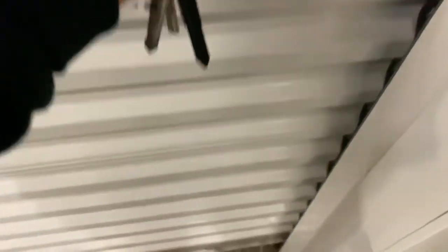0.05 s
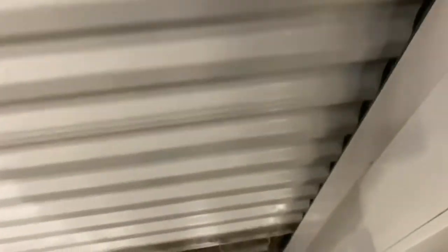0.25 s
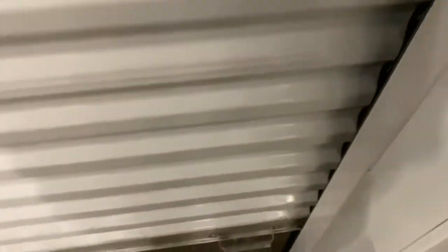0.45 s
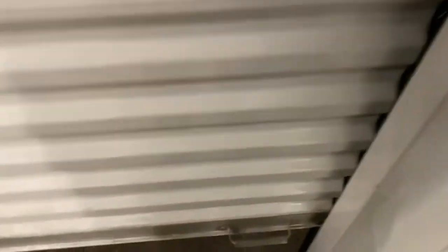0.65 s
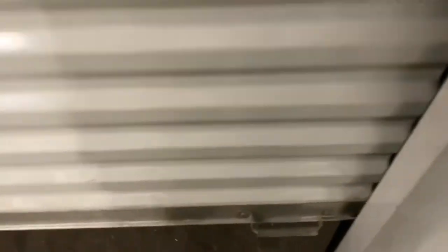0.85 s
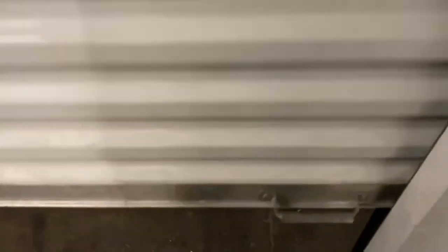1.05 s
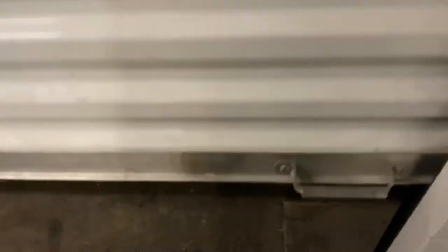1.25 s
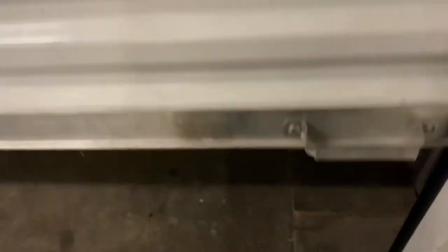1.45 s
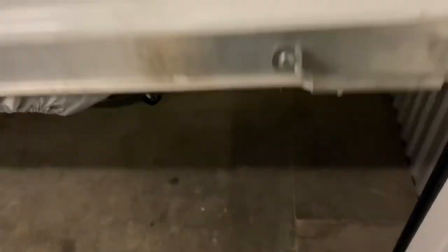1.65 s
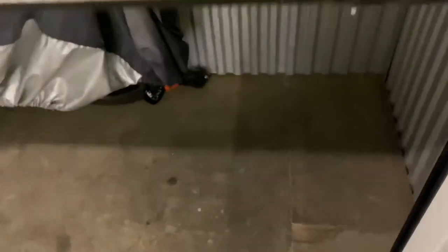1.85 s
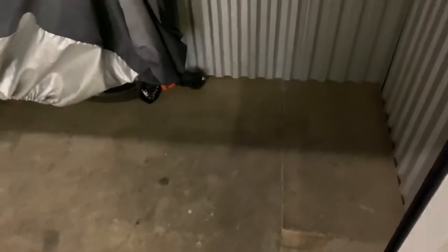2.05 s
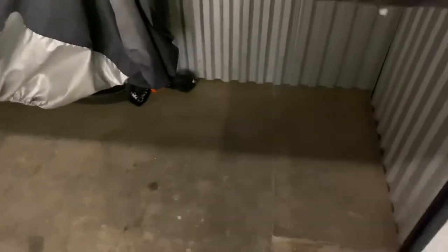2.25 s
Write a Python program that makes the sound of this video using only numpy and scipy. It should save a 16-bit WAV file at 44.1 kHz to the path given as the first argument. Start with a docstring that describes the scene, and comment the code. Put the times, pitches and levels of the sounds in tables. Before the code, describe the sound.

A metal roll-up door rolls open in an echoing storage corridor, near the microphone and slightly left. Its booming, knocking and rattling build to a loud clang at the top, followed by a small clink of keys.

```python
"""Opening a steel roll-up door

A corrugated door is pushed open in a storage corridor, close by and a little to the left. Its curtain
(the big ribbed sheet) booms, rattles and scrapes in the side guides, knocks, squeals and clangs against
the top stop. Keys clink in a hand while the door settles and the corridor's echo dies away."""
import sys
import numpy as np
from scipy import signal
from scipy.fft import rfft, irfft, next_fast_len
from scipy.io import wavfile
from scipy.ndimage import uniform_filter1d, map_coordinates

SR = 44100
rng = np.random.default_rng(int(sys.argv[2]) if len(sys.argv) > 2 else 0)


def digitize_waveform(pressure):
    """Quantize a signal to 16-bit integers and store it at the path in sys.argv[1].

    Rows of a 2-D input are taken as channels; values are limited to [-1, 1].
    """
    field = np.atleast_2d(pressure).T
    bounded = np.clip(field, -1, 1)
    quanta = np.round(bounded * 32767).astype(np.int16)
    wavfile.write(sys.argv[1], SR, quanta)


N = 101429

# A mode is a tone that an object rings at; t60 is the time a sound takes to fade by 60 dB.
# modes of the steel curtain: f/Hz, level/dB, t60/s
CURTAIN_MODES = [(63.1, -3.5, 0.3), (165.7, -1, .3), (380.5, -5, 0.2), (465, -9, 0.2), (502, -3, 0.12),
                 (705, -2, 0.11), (868, -4, 0.11), (1090, -6, .1)]
# modes of the door's bottom bar and its stops: f/Hz, level/dB, t60/s
BAR_MODES = [(1610, -1, .25), (1676, 1, .27), (1734, -1, .27), (2080, -4, .35), (2265, -3, .3),
             (2352, 0, .33), (2482, -3, .3), (4060, -4, .35), (5006, -3, .35), (6250, -2, .35),
             (6948, 0, .4), (7270, 5, .35), (9318, 0, .3), (10130, 1, .25)]


def undb(db):
    """Turn decibels into a factor to multiply by."""
    return 10 ** (np.asarray(db) / 20)


def unit(x):
    """Scale a signal to an average strength (rms) of 1."""
    return x / np.sqrt(np.mean(x ** 2))


def colour(x, points):
    """Make some pitches louder and others softer, along a curve of (f/Hz, level/dB) points."""
    hz, db = np.array(points, float).T
    size = next_fast_len(2 * N)
    f = np.maximum(np.fft.rfftfreq(size, 1 / SR), 1)
    gain = undb(np.interp(np.log(f), np.log(hz), db))
    # folding the cepstrum keeps the filter from sounding before its input
    cepstrum = irfft(np.log(gain), size)
    cepstrum[1:size // 2] *= 2
    cepstrum[size // 2 + 1:] = 0
    return irfft(rfft(x, size) * np.exp(rfft(cepstrum)), size)[:N]


def band(x, lo_hz, hi_hz):
    """Keep the pitches between two limits."""
    edges = [lo_hz, min(hi_hz, SR / 2 - 1)]
    return signal.sosfilt(signal.butter(3, edges, "band", fs=SR, output="sos"), x)


def fade(t, t60):
    """Silent before t = 0, then a jump to 1 that dies away."""
    return (t >= 0) * np.exp(-np.log(1000) * np.maximum(t, 0) / t60)


def drift(per_s):
    """A smooth random curve, about 1 in size, that heads for a new value per_s times a second."""
    step = int(SR / per_s)
    stairs = np.repeat(rng.standard_normal(N // step + 1), step)
    return unit(uniform_filter1d(stairs, step)[:N])


def grains(per_s, spread_db):
    """Tiny random impacts; a larger spread makes a few much stronger than the rest."""
    chance, size, sign = rng.random(N), rng.exponential(size=N), rng.choice([-1, 1], N)
    return (chance < per_s / SR) * sign * undb(spread_db * np.minimum(size, 4))


def still_air():
    """The building's air is a soft, low noise, different in each ear."""
    # tone of the air: f/Hz, level/dB
    air_tone = [(25, -6), (70, -3), (200, -0.5), (700, -15), (2000, -26), (5000, -34), (12000, -51)]
    return np.array([unit(colour(rng.standard_normal(N), air_tone)) for _ in range(2)])


def corridor(x, echo_db):
    """Steel walls and concrete echo: alike in both ears in the bass, shorter in the treble."""
    alike_hz, treble_hz, build_s = 265, 4000, .00025
    t = np.arange(N) / SR
    f = np.fft.rfftfreq(N, 1 / SR)
    mid, side = rfft(rng.standard_normal((2, N)))
    alike = 1 / (1 + (f / alike_hz) ** 2)
    noise = (mid * np.sqrt(1 + alike) + np.array([[1], [-1]]) * side * np.sqrt(1 - alike)) / np.sqrt(2)
    treble = f ** 2 / (f ** 2 + treble_hz ** 2)
    low_tail = irfft(noise * (1 - treble), N) * fade(t, t60=.63)
    high_tail = irfft(noise * treble, N) * fade(t, t60=.5)
    tail = (low_tail + high_tail) * (1 - np.exp(-t / build_s))
    tail /= np.sqrt(np.sum(tail ** 2) / 2)
    return undb(echo_db) * signal.fftconvolve(x[None], tail, axes=1)[:, :N]


def keys(t):
    """Keys tap each other: a tick and a short ring."""
    # taps of key on key: t/s, level/dB, pitch/ratio
    taps = [(1.9615, -42, 1.04), (1.9925, -21, 1), (2.003, -27, 1), (2.078, -33, .9)]
    # modes of the keys: f/Hz, level/dB, t60/s
    key_modes = [(3400, -2, .03), (5195, -15, .025), (6030, -12, .02), (6720, -8, .025), (9800, -15, .015),
                 (10750, -8, .018), (11150, -10, .015), (14800, -14, .02)]
    out = 0
    for start, db, pitch in taps:
        age = t - start
        ring = sum(undb(mode_db) * np.sin(2 * np.pi * hz * pitch * age) * fade(age, t60)
                   for hz, mode_db, t60 in key_modes)
        tick = band(rng.standard_normal(N) * fade(age, t60=.036), 1600, 7100)
        out += undb(db) * (ring + undb(2) * tick) / 2
    return out


def edge_strips(t):
    """The curtain's edge strips grab with a gritty rasp, then slide with a smooth hiss."""
    # tone of the rasp: f/Hz, level/dB
    rasp_tone = [(800, -12), (2000, -3), (4200, 0), (7000, -7), (11000, -11), (13000, -26)]
    # tone of the hiss: f/Hz, level/dB
    hiss_tone = [(1500, 17), (4000, -9), (6900, 9.5), (9000, 3), (11500, 4), (13000, -42)]
    grab_s, stop_s = .214, 1.63
    rasp = unit(colour(grains(per_s=1700, spread_db=4), rasp_tone))
    hiss = unit(colour(rng.standard_normal(N), hiss_tone))
    sliding = np.where(t < grab_s, undb(-7), fade(np.maximum(t - stop_s, 0), t60=.39))
    return undb(-42) * fade(t - grab_s, t60=.4) * rasp + undb(-46.5) * sliding * hiss


def squeals(t):
    """Dry steel drags on steel in the guide and gives brief, rough tones."""
    # squeals: start/s, length/s, f/Hz, level/dB
    drags = [(1.568, .05, 4720, -46), (1.62, .06, 4640, -33), (.809, .042, 15150, -33)]
    pitch_wobble, ramp_s, rough_db = .006, .009, 2.5
    out = 0
    for start, length, hz, db in drags:
        gate = np.clip(np.minimum(t - start, start + length - t) / ramp_s, 0, 1)
        wobbling_hz = hz * (1 + pitch_wobble * drift(per_s=1200))
        tone = np.sin(2 * np.pi * np.cumsum(wobbling_hz) / SR)
        out += undb(db) * gate * unit(tone * undb(rough_db * drift(per_s=220)))
    return out


def flexes(t):
    """The whole sheet bows and swings back: a few deep cycles that swell and fade."""
    # swings of the curtain: middle/s, length/s, f/Hz, level/dB
    swings = [(.46, .12, 64, -31), (.885, .17, 77, -22), (1.095, .12, 62, -22), (1.75, .15, 68, -24)]
    out = 0
    for middle, length, hz, db in swings:
        swell = np.cos(np.pi * np.clip((t - middle) / length, -.5, .5)) ** 2
        out += undb(db) * swell * np.sin(2 * np.pi * hz * (t - middle + rng.random() / hz))
    return out


def resonate(x, modes, ring_db):
    """A sound plus the modes that it sets ringing."""
    t = np.arange(SR) / SR
    ring = sum(undb(db) * 2 * np.cos(2 * np.pi * hz * t) * fade(t, t60) / np.sum(fade(t, t60))
               for hz, db, t60 in modes)
    return x + undb(ring_db) * signal.fftconvolve(x, ring)[:N]


def steel(x):
    """A sound makes the curtain ring, and then its bottom bar."""
    curtain = resonate(x, CURTAIN_MODES, ring_db=-2.5)
    return resonate(curtain, BAR_MODES, ring_db=0)


def top_stop(t):
    """The bar clangs on the top stops and bounces; each hit rings the modes near its own pitch."""
    # hits of the bar: t/s, level/dB, centre f/Hz, t60/s
    hits = [(1.6965, -21, 1700, .09), (1.698, -35, 9500, .09), (1.707, -36, 7300, .16),
            (1.7515, -36, 5500, .1), (1.8, -35, 2200, .1), (1.801, -23, 1050, .08), (1.815, -19, 720, .11)]
    octave_away_db = -20
    out = 0
    for start, db, centre_hz, t60 in hits:
        age = t - start
        for hz, mode_db, _ in CURTAIN_MODES + BAR_MODES:
            gain = undb(db + mode_db + octave_away_db * np.log2(hz / centre_hz) ** 2)
            out += gain * rng.choice([-1, 1]) * np.sin(2 * np.pi * hz * age) * fade(age, t60)
    return out


def knocks(t):
    """The curtain hits its guides and the stop: each knock is a crack and a short wash of steel noise."""
    # knocks, with a level for each of four pitch bands: t/s, thud/dB, clank/dB, clash/dB, sizzle/dB
    blows = [(.226, -37, -29, -35, -37), (.3, -35, -33, -28, -42), (.415, -38, -39, -35, -47),
             (.46, -28, -29, -46, -53), (.573, -31, -26, -42, -50), (.659, -31, -23, -35, -42),
             (.7, -31, -27, -41, -50), (.752, -36, -33, -37, -40), (.768, -19, -24, -30, -38),
             (.779, -20, -21, -17, -31), (.799, -20, -27, -31, -47), (.934, -30, -23, -25, -36),
             (.957, -27, -24, -42, -50), (1.041, -29, -19, -29, -48), (1.098, -21, -27, -34, -40),
             (1.241, -25, -21, -27, -29), (1.291, -29, -20, -33, -38), (1.333, -34, -26, -35, -36),
             (1.439, -14, -17, -33, -44), (1.476, -33, -24, -37, -48), (1.538, -22, -25, -39, -48),
             (1.609, -18, -25, -36, -39), (1.658, -36, -23, -22, -35), (1.69, -36, -28, -22, -38),
             (1.696, -35, -24, -12, -19), (1.708, -38, -25, -21, -23), (1.751, -32, -31, -27, -19),
             (1.8, -30, -22, -19, -31), (1.923, -35, -36, -39, -45), (2.035, -29, -38, -52, -60)]
    # edges of the bands: f/Hz
    edges = [70, 280, 950, 2800, 15500]
    # fade time of each band: t60/s
    fade_times = [.17, .14, .09, .11]
    # gain of each band: level/dB
    band_db = [-3.5, -4, -4.5, -3]
    # tone of struck sheet steel: f/Hz, level/dB
    sheet_tone = [(70, -9), (160, 5.5), (260, -3), (500, -1), (750, -1.5), (1100, -7), (1400, -12),
                  (1680, -12.5), (1950, -15.5), (2300, -17), (2800, -19), (3400, -17), (4100, -16.5),
                  (4450, -24), (5050, -16), (5500, -20.5), (7300, -26.5), (8600, -35.5), (10800, -33.5),
                  (13000, -44)]
    crack_db, crack_t60 = -3, .005 * np.log(1000)
    wash = colour(rng.standard_normal(N), sheet_tone)
    out = 0
    for k, t60 in enumerate(fade_times):
        lo_hz, hi_hz = edges[k:k + 2]
        bursts = sum(undb(levels[k]) * (fade(t - at, t60) + undb(crack_db) * fade(t - at, crack_t60))
                     for at, *levels in blows)
        noise = band(wash, lo_hz, hi_hz)
        steady_noise = noise / np.sqrt(uniform_filter1d(noise ** 2, size=700))
        out += undb(band_db[k]) * band(steady_noise * bursts, lo_hz / 2, hi_hz * 2)
    return steel(out)


def bend(x):
    """The ringing drifts up and down in pitch as the curtain bends over the drum it winds on."""
    speed = 1 + .07 * drift(per_s=14)
    return map_coordinates(x, [np.cumsum(speed)], mode="mirror")


def rolling(t):
    """The flexing curtain booms, its ribs chatter over the drum, its edges scrape along the guides."""
    # loudness of the moving door: t/s, boom/dB, rattle/dB, scrape/dB
    travel = [(0, -39, -34, -42), (.2, -35.5, -42, -52), (.33, -37, -34.5, -46.5), (.55, -31.5, -39.5, -42),
              (.72, -31.5, -31, -39.5), (.87, -26, -37, -38.5), (1, -31.5, -32.5, -37.5),
              (1.1, -41, -51, -36), (1.16, -39, -32.5, -41), (1.218, -29, -28.5, -33.5),
              (1.362, -30.5, -22, -29), (1.48, -31, -27.5, -34.5), (1.58, -31.5, -31.5, -36),
              (1.67, -24.5, -18, -19), (1.76, -27, -59, -63), (1.84, -29.5, -40, -53),
              (1.93, -32.5, -33, -31.5), (2.03, -46, -47, -49), (2.13, -44, -49, -48.5),
              (2.3, -53, -58, -88)]
    # tones of the boom, the rattle and the scrape: f/Hz, level/dB
    boom_tone = [(20, -35), (33, -16), (40, -8), (50, 2), (66, 2), (80, 4.5), (100, 3), (125, -1),
                 (162, -3), (200, -3), (260, -14.5), (420, -42.5)]
    rattle_tone = [(120, -24.5), (230, -2.5), (300, 7), (400, 1), (520, 4), (720, 1.5), (900, -5.5),
                   (1250, -5), (2200, -36.5)]
    scrape_tone = [(500, 4), (1000, 2), (1400, 13.5), (2300, 13.5), (3100, 15), (4900, 6.5), (5600, 7),
                   (7000, -1), (9000, -4.5), (11500, -7.5), (13000, -21), (15500, 1)]
    times, *levels = np.array(travel).T
    boom_gain, rattle_gain, scrape_gain = (undb(np.interp(t, times, db)) for db in levels)
    boom = bend(steel(colour(grains(per_s=900, spread_db=2.3), boom_tone)))
    rattle = bend(steel(colour(grains(per_s=400, spread_db=2), rattle_tone)))
    scrape = steel(colour(grains(per_s=7000, spread_db=0), scrape_tone))
    clatter = undb(-1) * unit(rattle) * rattle_gain + undb(-4) * unit(scrape) * scrape_gain
    judder = undb(2 * drift(per_s=54.02))  # the level shakes by about 2 dB
    return undb(1) * unit(boom) * boom_gain + judder * clatter


def scene():
    """The door reaches the left ear first; the keys are close and in the middle."""
    # how much louder the door is on the left than on the right: f/Hz, level/dB
    balance = [(60, 1), (200, -2), (380, 1), (700, 5), (1290, -0.5), (2380, -2), (4400, 2.5), (8100, -3.5),
               (15000, 1.5)]
    right_delay_s = .0004463
    t = np.arange(N) / SR
    door = rolling(t) + flexes(t) + edge_strips(t) + knocks(t) + top_stop(t) + squeals(t)
    clinks = keys(t)
    delay = np.exp(-2j * np.pi * np.fft.rfftfreq(2 * N, 1 / SR) * right_delay_s)
    late_door = irfft(rfft(door, 2 * N) * delay)[:N]
    left, right = np.array([door, late_door]) + corridor(door, echo_db=-.5)
    left = colour(left, [(hz, db / 2) for hz, db in balance])
    right = colour(right, [(hz, -db / 2) for hz, db in balance])
    air = undb(-45) * still_air()
    return undb(-3.5) * np.array([left, right]) + clinks + corridor(clinks, echo_db=-17) + air


def record(dry):
    """The highest treble is dulled, and a steep filter cuts off the very top."""
    # treble roll-off: f/Hz, level/dB
    treble_rolloff = [(1000, 0), (12000, 0), (12900, -7), (16000, -7)]
    top_hz = 15900
    dulled = np.array([colour(x, treble_rolloff) for x in dry])
    return signal.sosfilt(signal.ellip(8, .2, 70, top_hz, fs=SR, output="sos"), dulled)


dry = scene()
out = record(dry)
digitize_waveform(out)
```